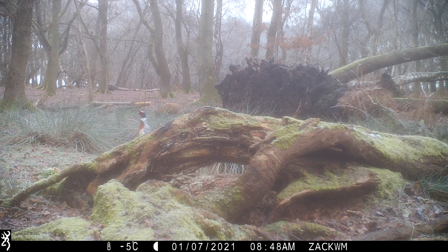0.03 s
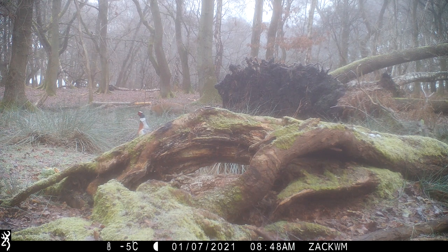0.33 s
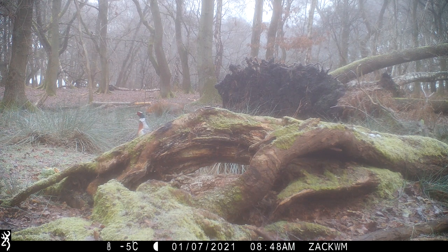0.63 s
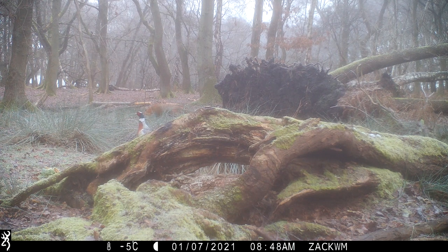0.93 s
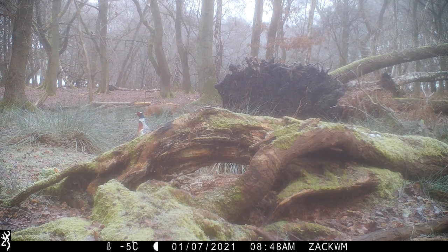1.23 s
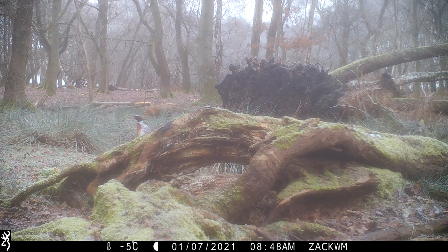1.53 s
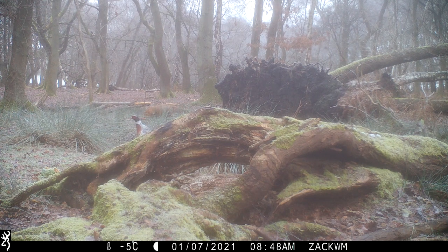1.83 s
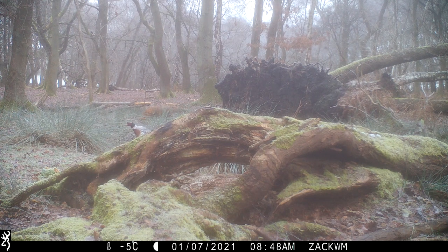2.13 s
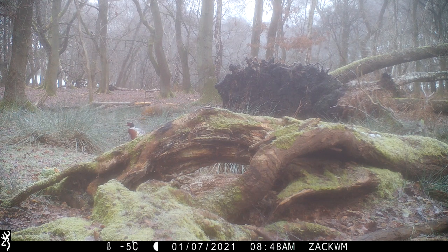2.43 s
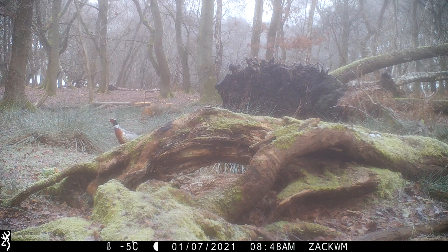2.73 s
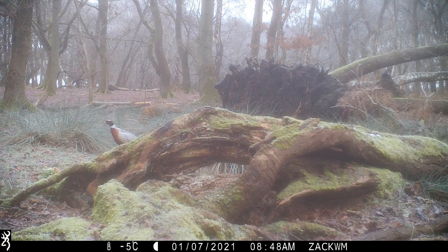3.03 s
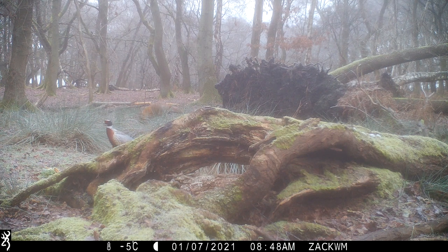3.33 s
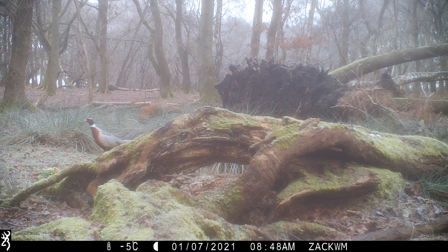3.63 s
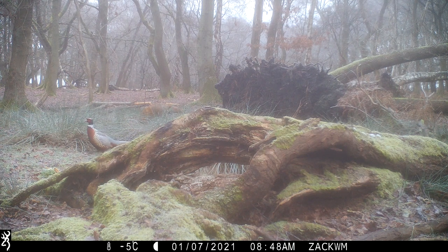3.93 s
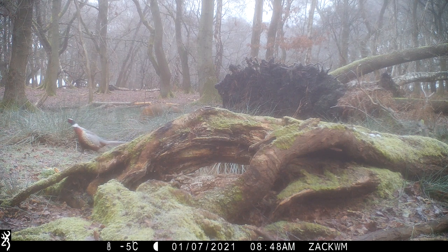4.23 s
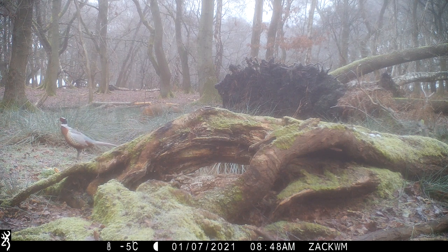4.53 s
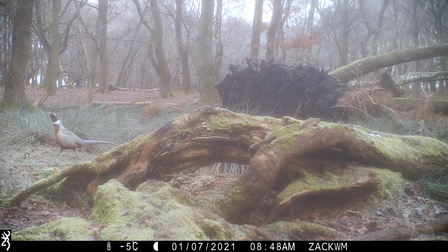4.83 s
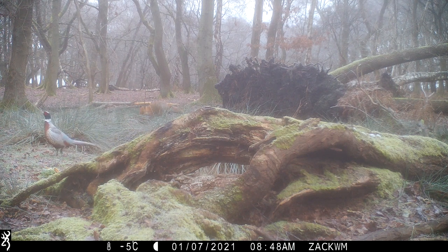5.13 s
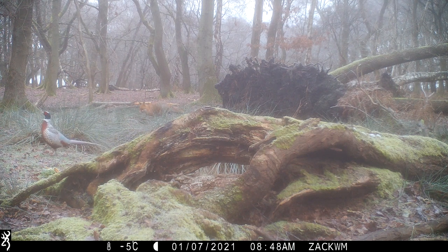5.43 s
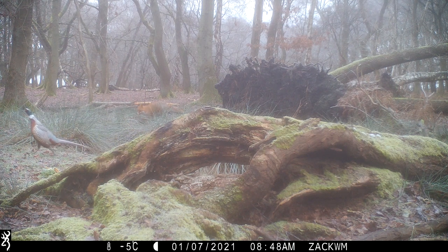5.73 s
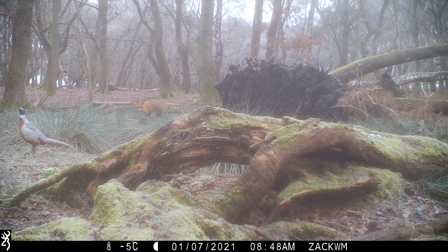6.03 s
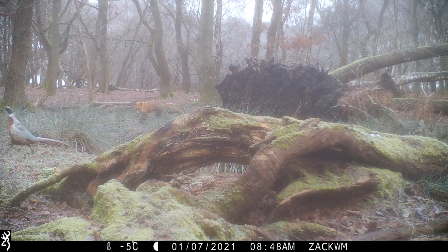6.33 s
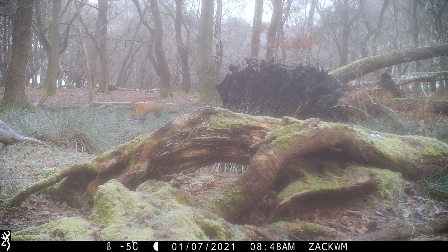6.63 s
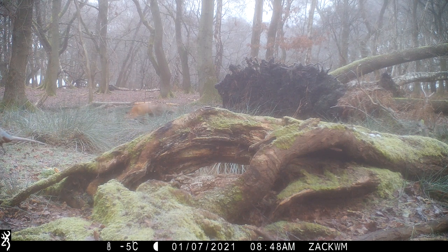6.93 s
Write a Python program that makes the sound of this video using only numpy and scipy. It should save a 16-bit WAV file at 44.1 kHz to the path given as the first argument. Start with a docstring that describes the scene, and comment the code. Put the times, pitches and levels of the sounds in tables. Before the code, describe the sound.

In a still, frosty wood, a far jay screeches hoarsely twice. Small birds chip faintly now and then, with tiny grass rustles and twig ticks, and distant crows begin to caw. Then a nearby cock pheasant gives one loud, very short, harsh crow that echoes briefly off the trunks. The crows and small birds carry on. The trail camera's microphone adds a soft hiss and a faint thin whine over a low, distant rush.

```python
"""A still, frosty wood: a distant rush and a trail camera's hiss and thin whine run throughout.
First a far jay screeches twice, pulses and air ringing in its throat. Small birds chip now and then,
grass rustles, twigs tick, and from 3.3 s distant crows call. At 4.9 s a near cock pheasant gives one
short, harsh crow from two syrinx membranes and rasping air. The trunks scatter it back, and the crows
and small birds carry on."""
import sys
import numpy as np
from scipy import signal
from scipy.fft import rfft, irfft, next_fast_len
from scipy.io import wavfile
from scipy.ndimage import map_coordinates

SR = 44100
rng = np.random.default_rng(int(sys.argv[2]) if len(sys.argv) > 2 else 0)


def generate_wav(sig):
    """Save sig (samples, or channels by samples) to the path in sys.argv[1] as 16-bit PCM at SR."""
    pcm = np.round(np.clip(np.atleast_2d(sig).T, -1, 1) * 32767).astype(np.int16)
    wavfile.write(sys.argv[1], SR, pcm)


N = 307818


def amp(db):
    """Decibels to gain."""
    return 10 ** (np.asarray(db) / 20)


def unit(x):
    """Scale to rms 1."""
    return x / np.sqrt(np.mean(x ** 2) + 1e-20)


def along(points, hz):
    """Interpolate (Hz, value) points on a log frequency axis."""
    point_hz, values = np.transpose(points)
    return np.interp(np.log(hz + 1), np.log(point_hz + 1), values)


def clock():
    """Sample times in seconds."""
    return np.arange(N) / SR


def progress(start_s, length_s):
    """Ramp from 0 to 1 over an event."""
    return np.clip((clock() - start_s) / length_s, 0, 1)


def gate(start_s, length_s, edge_s):
    """Window with linear edges."""
    t = clock() - start_s
    return np.clip(np.minimum(t, length_s - t) / edge_s, 0, 1)


def wobble(knots_per_s):
    """Smooth random curve."""
    knots = rng.standard_normal(int(N * knots_per_s / SR) + 4)
    return map_coordinates(knots, [clock() * knots_per_s])


def cycle(hz):
    """Running phase in radians."""
    return 2 * np.pi * np.cumsum(hz) / SR


def filtered(x, response):
    """Apply a complex response, given as a function of Hz."""
    size = next_fast_len(N + SR // 2)
    return irfft(rfft(x, size) * response(np.fft.rfftfreq(size, 1 / SR)), size)[:N]


def resonances(modes, f):
    """Causal response of (centre Hz, width Hz, gain dB) modes, alternating in sign."""
    return sum((-1) ** k * amp(db) * 1j * f * width_hz / (hz * hz - f * f + 1j * f * width_hz)
               for k, (hz, width_hz, db) in enumerate(modes))


def band(x, hz, width_hz):
    """Pass x twice through one resonance; rms 1."""
    return unit(filtered(x, lambda f: resonances([(hz, width_hz, 0)], f) ** 2))


def noise(spectrum):
    """Noise coloured by (Hz, dB) points; rms 1."""
    return unit(filtered(rng.standard_normal(N), lambda f: amp(along(spectrum, f))))


def puffs(phase):
    """Turbulent air, let through once a cycle."""
    return rng.standard_normal(N) * (1 + np.cos(phase)) ** 2


def hiss(level_db=-59.0, waver_db=0.38):
    """The camera's soft, even hiss."""
    # Each row: frequency in Hz, relative density in dB.
    spectrum = [(20, -15), (40, -6.5), (60, -0.5), (110, 1), (138, -3.5), (190, -1.5), (420, -1.5),
                (600, -0.5), (1050, 1.5), (1800, -3.5), (2700, -10), (4800, -25.5), (6500, -37),
                (15000, -42)]
    return amp(level_db + waver_db * wobble(1.6)) * noise(spectrum)


def distant_rush(level_db=-59.4, ebb_db_per_s=0.2, lull_s=2.6, lull_half_width_s=0.43, lull_db=4.5):
    """A low, far rush that ebbs slowly and has one lull."""
    # Each row: frequency in Hz, relative density in dB.
    spectrum = [(120, -65), (160, -21.5), (190, -12.5), (215, -5), (285, -1), (320, -5), (370, -14),
                (450, -32.5), (700, -120)]
    lull = np.exp(-((clock() - lull_s) / lull_half_width_s) ** 2)
    rush_db = level_db - ebb_db_per_s * clock() - lull_db * lull
    return amp(rush_db - 0.2 * wobble(12)) * noise(spectrum)


def whine(level_db=-80.0, whine_hz=7797.5, frame_hz=59.4):
    """The camera's electronics whine, flipping polarity at every frame."""
    polarity = np.sign(np.sin(np.pi * frame_hz * clock()))
    return amp(level_db) * np.sin(2 * np.pi * whine_hz * clock()) * polarity


def trunks(x, cluster_db=2.0, cluster_s=0.055, spread_s=0.069):
    """Near trunks answer in a thick cluster; the deep wood rings on, the treble dying soonest."""
    # Each row: frequency in Hz, time to decay 60 dB in seconds.
    t60_s = [(500, .85), (1000, 1.4), (1500, 0.69), (2000, 0.91), (3700, 0.92), (5000, 0.63), (8000, 0.76),
             (15000, 0.56)]
    # Each row: frequency in Hz, relative echo gain in dB.
    colour = [(600, -2), (880, 5), (1080, 0), (1900, 0), (2800, -1.5), (3650, 3), (4900, -0.5), (6500, 1)]
    hz, t, spectra = signal.stft(rng.standard_normal(SR), SR, nperseg=256)
    cluster = np.exp(-((t - cluster_s) / spread_s) ** 2)
    decay = amp(-60 * t / along(t60_s, hz)[:, None] + cluster_db * cluster)
    tail = signal.istft(spectra * decay * amp(along(colour, hz))[:, None], SR, nperseg=256)[1]
    impulse_response = np.pad(tail / np.linalg.norm(tail), (SR // 200, 0))  # 5 ms delay
    return signal.fftconvolve(x, impulse_response)[:N]


def grass(crackle_db=5):
    """Stiff, frosty blades brush past each other in tiny crackles."""
    # Each row: frequency in Hz, relative density in dB.
    spectrum = [(2000, -60), (3800, 1), (4800, -1), (6500, -11), (8500, -24), (13000, -50)]
    # Each row: start in seconds, length in seconds, level in dB.
    rustles = [(1.48, .07, -84), (4.232, .08, -82.5), (6.3, 0.189, -84)]
    crackle = unit(noise(spectrum) * amp(crackle_db * wobble(500)))
    return crackle * sum(amp(db) * gate(start_s, length_s, 0.02) for start_s, length_s, db in rustles)


def twigs(t60_s=0.016, ring_hz=5200, width_hz=2200):
    """Frozen twigs tick with a short, bright crack."""
    # Each row: start in seconds, initial level in dB.
    ticks = [(2.618, -65), (3.595, -74)]
    crack = band(rng.standard_normal(N), ring_hz, width_hz)
    t = clock()
    return crack * sum(amp(db - 60 * np.abs(t - start_s) / t60_s) * (t >= start_s)
                       for start_s, db in ticks)


def small_birds(fall_share=0.21, quaver_share=0.02, flutter_db=3, gain_db=-2):
    """Each chip is a thin, quavering downward glide that flutters in strength."""
    # Each row: start in seconds, length in seconds, starting pitch in Hz, relative level in dB.
    chips = [(0.044, 0.045, 6400, -83), (3.066, 0.062, 5800, -84), (3.264, .06, 5750, -81),
             (4.065, .035, 6560, -85), (5.446, .06, 5150, -81), (5.951, .085, 5160, -79),
             (6.15, 0.13, 5250, -83.5), (6.612, .035, 6200, -80)]
    quaver = 1 + quaver_share * wobble(270)
    flutter = unit(amp(flutter_db * wobble(110)))
    calls = np.zeros(N)
    for start_s, length_s, hz, db in chips:
        glide_hz = hz * (1 - fall_share * progress(start_s, length_s))
        calls += amp(db) * gate(start_s, length_s, 0.011) * np.sin(cycle(quaver * glide_hz))
    return amp(gain_db) * flutter * calls


def crows(pitch_hz=580, width_hz=520, length_s=0.082):
    """Rough calls; only the strongest throat resonance carries this far."""
    # Each row: start in seconds, relative level in dB, throat resonance in Hz.
    caws = [(3.268, -64, 2650), (3.728, -62, 2400), (4.228, -61.5, 2380), (4.652, -65, 2800),
            (5.248, -56.5, 2220), (5.39, -59.5, 2380), (5.536, -61, 2320), (5.938, -57.5, 2280),
            (6.248, -59, 2310)]
    air = puffs(cycle(pitch_hz * (1 + 0.033 * wobble(60))))
    return sum(amp(db) * gate(start_s, length_s, 0.055) * band(air, hz, width_hz)
               for start_s, db, hz in caws)


def jay(pitch_hz=385, jitter=0.04, air_db=1, fade_db=2.5, lowpass_hz=4500):
    """Hoarse, fading screeches of uneven pulses and air; distance takes their treble."""
    # Each row: start in seconds, length in seconds, level in dB.
    screeches = [(0.046, 0.286, -59.8), (1.061, 0.3, -60.5)]
    # Each row: resonance in Hz, width in Hz, relative gain in dB.
    throat = [(1890, 190, -4), (2280, 200, -0.4), (2730, 260, -0.5), (4400, 600, -19)]
    phase = cycle(pitch_hz * (1 + jitter * wobble(250)))
    pulses = np.diff(np.floor(phase / (2 * np.pi)), prepend=0)
    source = unit(pulses) + amp(air_db) * unit(puffs(phase))
    voice = unit(filtered(source, lambda f: resonances(throat, f) / (1 + (f / lowpass_hz) ** 6)))
    return voice * sum(amp(db - fade_db * progress(start_s, length_s)) * gate(start_s, length_s, 0.019)
                       for start_s, length_s, db in screeches)


def shrill_voice(age_s, release, start_hz=3670, rise_hz_per_s=1100, jitter=0.028, shimmer_db=3,
                 base_db=-28.5, fade_db_per_s=54, release_db=18,
                 surge_hz=26, surge_db=4, surge_peak_s=0.013):
    """Second voice of the pheasant's syrinx: strong at once, it creeps upward, surges and weakens."""
    surge = np.cos(2 * np.pi * surge_hz * (age_s - surge_peak_s))
    level_db = base_db - fade_db_per_s * age_s + surge_db * surge - release_db * release
    shimmer = amp(shimmer_db * wobble(350))
    pitch_hz = (start_hz + rise_hz_per_s * age_s) * (1 + jitter * wobble(900))
    return amp(level_db) * unit(shimmer * np.sin(cycle(pitch_hz)))


def pheasant(start_s=4.874, length_s=0.078, effort_db=-19, release_s=0.023, release_db=17.5,
             pitch_hz=1027.6, sag_hz=224.5, jitter=0.0189, shimmer_db=1.6, throb_hz=67,
             tone_db=-1.5, rasp_db=-4.5, attack_s=0.0099, tone_attack_db=22, rasp_attack_db=8):
    """Two unsteady membranes sound at once; air chopped by the lower one rasps in the throat."""
    # Each row: multiple of the pitch, relative level in dB, signed throb depth in dB.
    harmonics = [(1, -5, -1), (2, -1.5, 1.5), (3, -22.5, 2.5), (4, -28.5, 1.5), (5, -31.5, 0.5)]
    # Each row: throat or beak resonance in Hz, width in Hz, relative gain in dB.
    throat = [(603, 61, -4.5), (930, 210, -5), (1600, 335, 1), (1957, 120, 5.5), (2740, 620, -6),
              (3616, 410, -1.5), (4860, 230, -2)]
    # Each row: frequency in Hz, relative gain in dB.
    rasp_slope = [(330, -39.5), (480, -17), (580, -2), (2000, 1), (5000, -1), (5500, -8), (6100, -3.5),
                  (7400, -15.5), (9000, -7.5), (11800, -16.5), (13200, -28.5), (15500, -12.5)]
    age_s = np.clip(clock() - start_s, 0, length_s)
    attack_left = np.clip(1 - age_s / attack_s, 0, 1)
    release = np.clip(1 - (length_s - age_s) / release_s, 0, 1)
    effort = amp(effort_db - release_db * release ** 2)
    # The pitch holds, then sags as the effort is released.
    phase = cycle((pitch_hz - sag_hz * release) * (1 + jitter * wobble(600)))
    throb = np.cos(2 * np.pi * throb_hz * (clock() - start_s - attack_s))
    tone = unit(sum(amp(db + depth_db * throb + shimmer_db * wobble(260)) * np.sin(k * phase)
                    for k, db, depth_db in harmonics))
    rasp = unit(filtered(puffs(phase), lambda f: resonances(throat, f) * amp(along(rasp_slope, f))))
    tone *= amp(tone_db - tone_attack_db * attack_left)
    rasp *= amp(rasp_db - rasp_attack_db * attack_left)  # the air leads the tone
    return (effort * (tone + rasp) + shrill_voice(age_s, release)) * gate(start_s, length_s, 0.001)


def scene(near_wet_db=-15, far_wet_db=-6):
    """The pheasant is near and fairly dry; the rest lies deep in the trees, small birds deepest."""
    near = pheasant()
    far = jay() + crows() + twigs() + grass()
    canopy = small_birds()
    echo = trunks(amp(near_wet_db) * near + amp(far_wet_db) * far + canopy)
    return (near + far + canopy + echo + hiss() + distant_rush() + whine())[None]


def record(dry, limit_hz=15750):
    """The camera passes nothing above its band limit."""
    return filtered(dry[0], lambda hz: hz < limit_hz)[None]


dry = scene()
out = record(dry)
generate_wav(out)
```